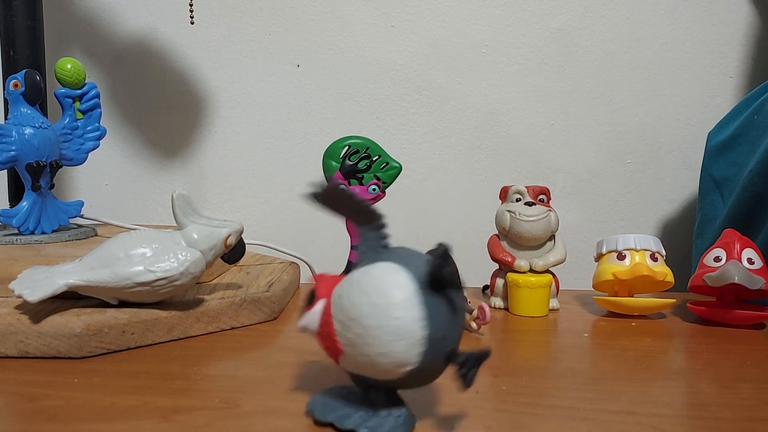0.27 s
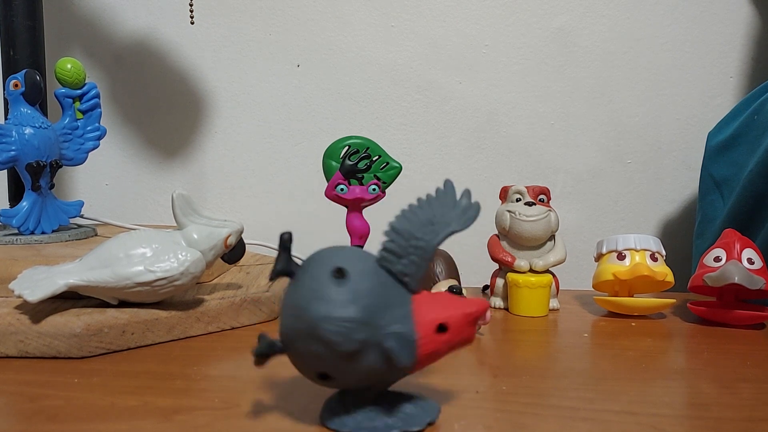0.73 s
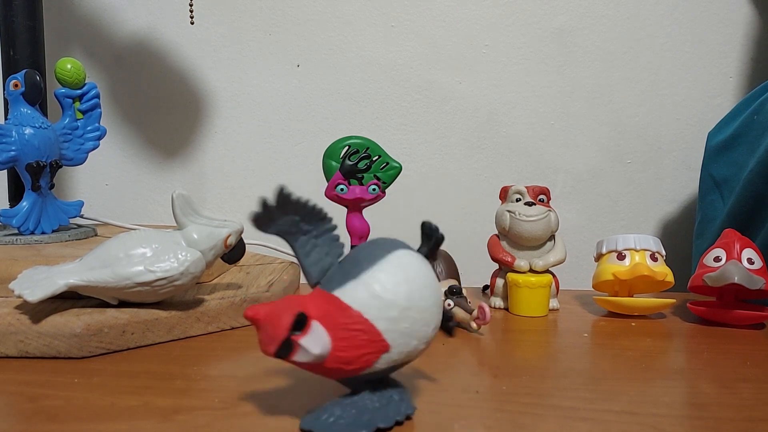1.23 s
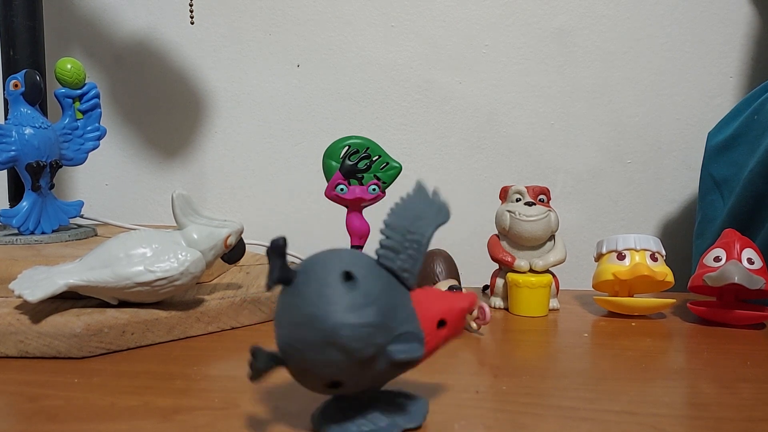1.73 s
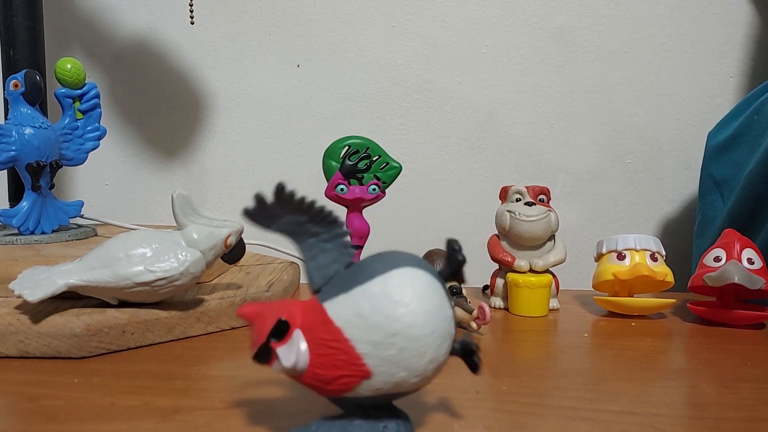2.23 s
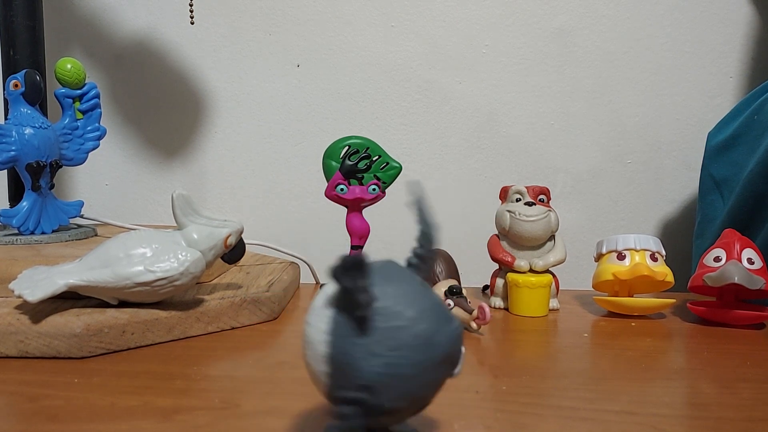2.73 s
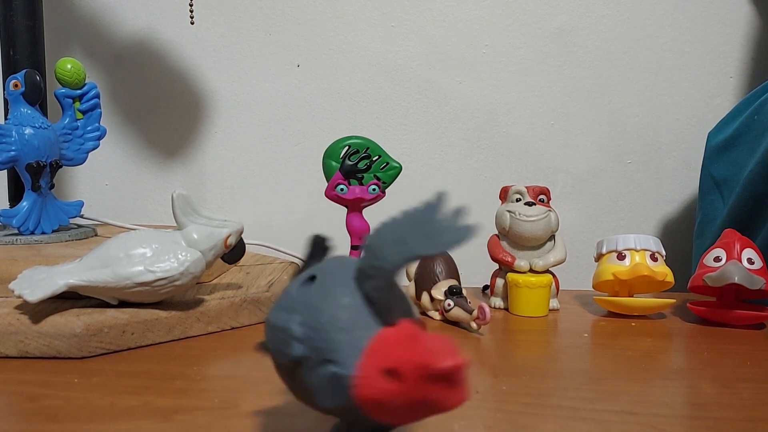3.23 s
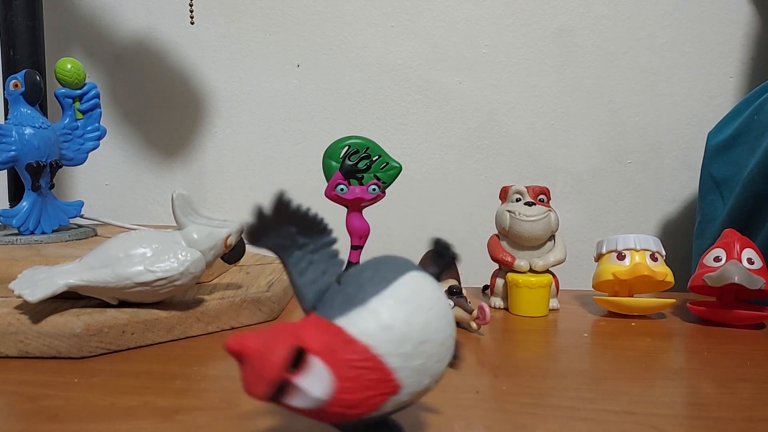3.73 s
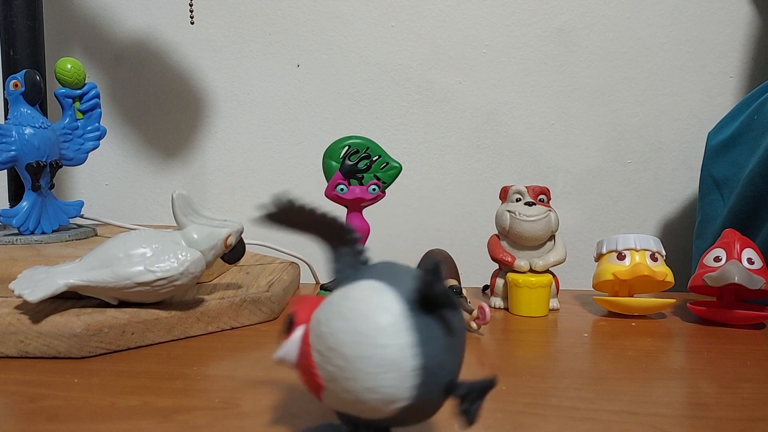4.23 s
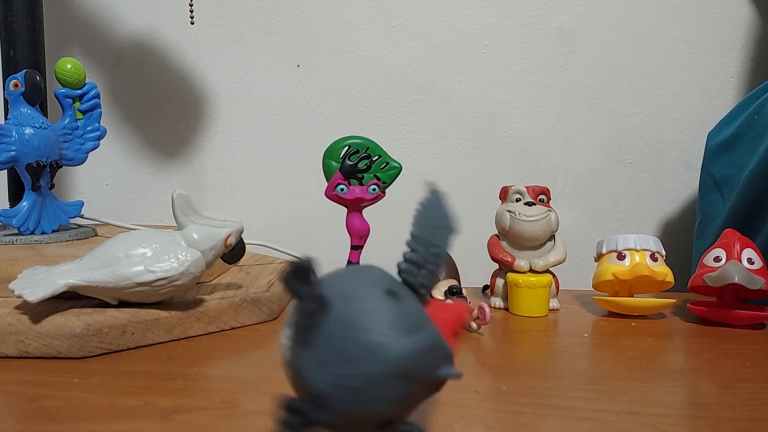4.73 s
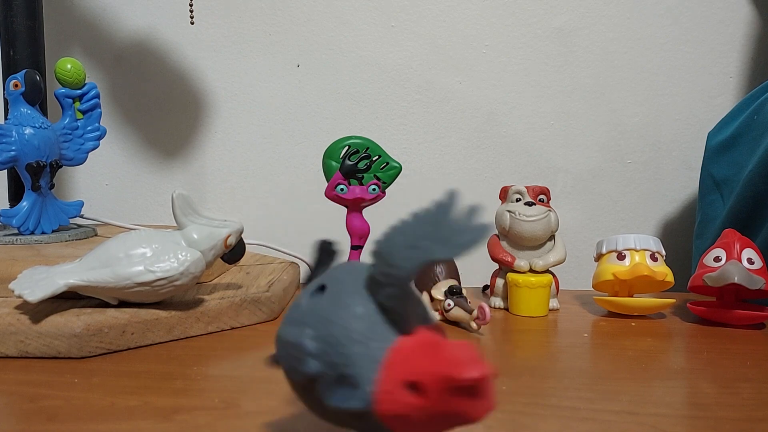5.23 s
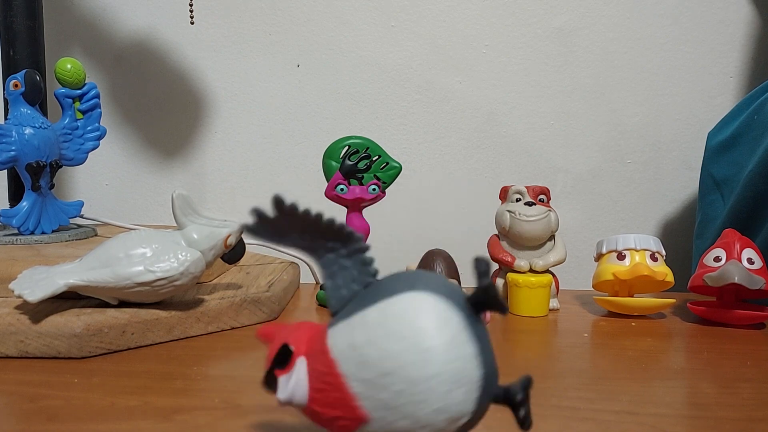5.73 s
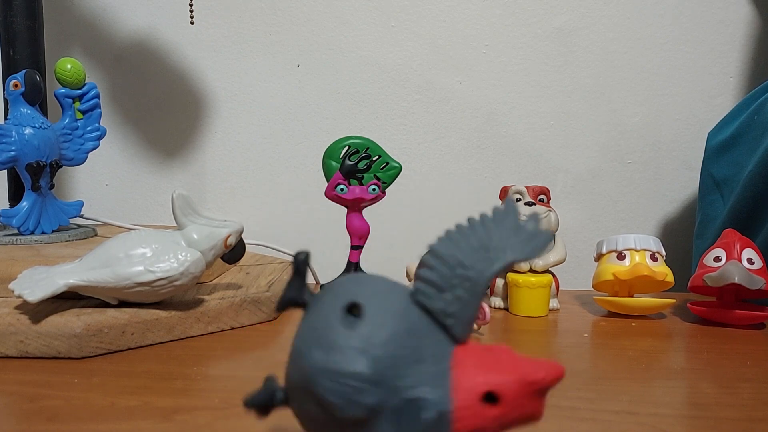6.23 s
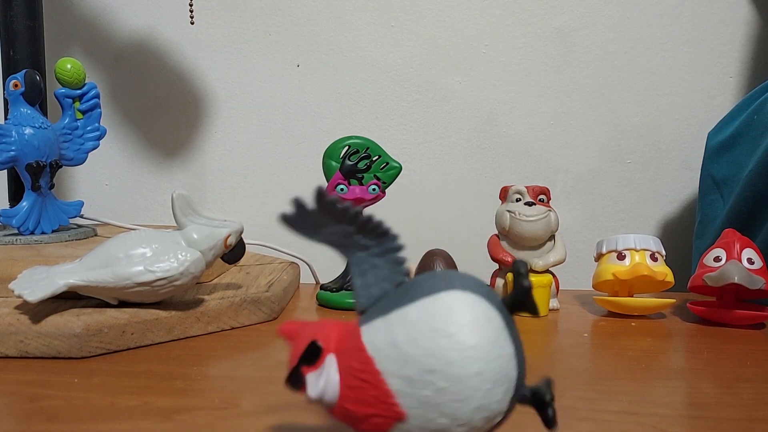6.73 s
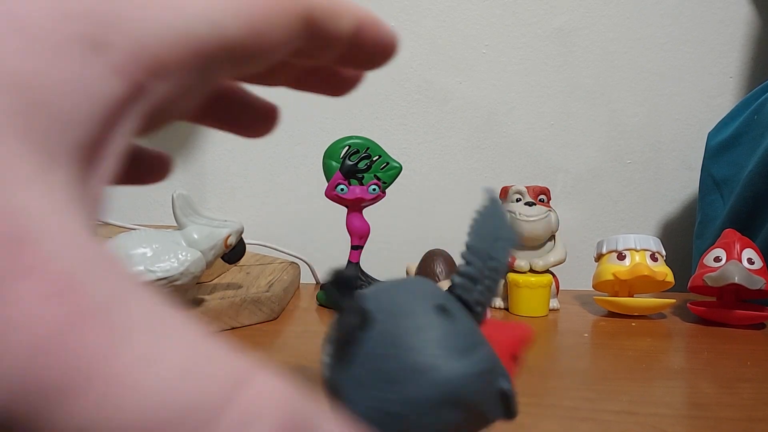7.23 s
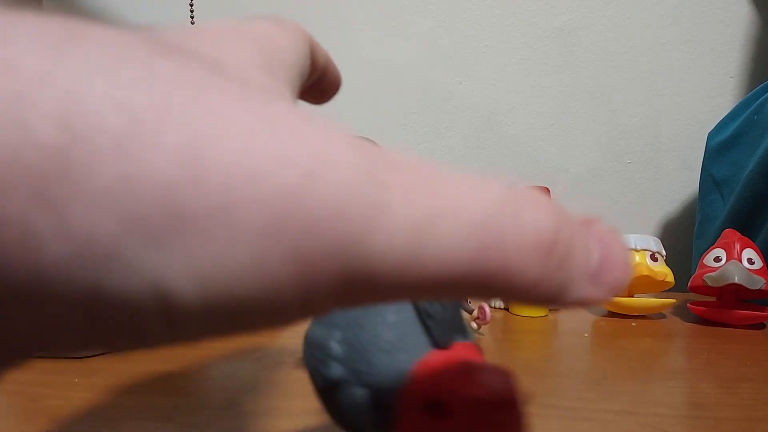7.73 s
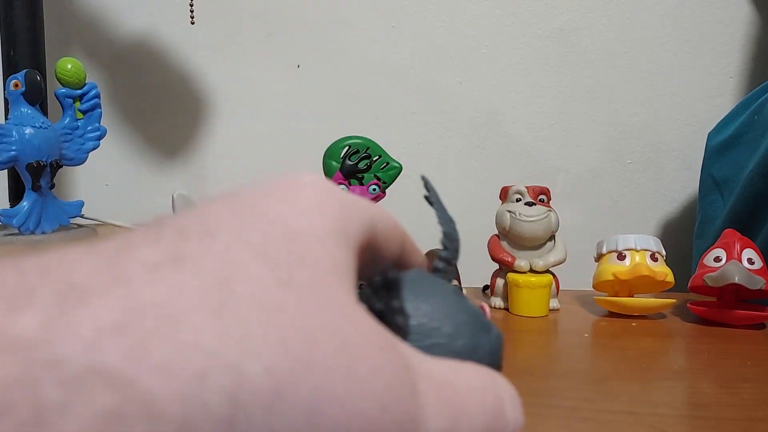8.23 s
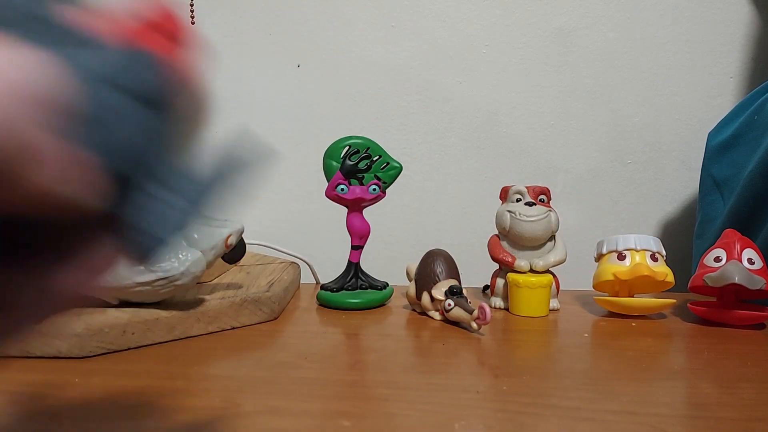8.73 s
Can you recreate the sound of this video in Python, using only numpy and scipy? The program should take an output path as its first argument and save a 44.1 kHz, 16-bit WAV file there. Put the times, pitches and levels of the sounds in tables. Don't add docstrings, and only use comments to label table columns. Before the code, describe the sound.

From the very start a clockwork plastic toy bird whirrs loudly and steadily, close to a stereo pair of microphones on a wooden table. The sound is a dry, bright, grainy rattle of fast gear teeth, swelling slightly about one and a half times a second, its colour changing as the body turns round every 0.7 to 0.9 seconds. Tiny hitches and surges interrupt it. Beneath, the foot rubs and scuffs irregularly, with soft low thuds, notably around 1.3, 2.2, 3.0 and 6.0 seconds, and light shell ticks. At about 8.1 to 8.3 a hand grabs it with knocks and a low bump; the whirr chokes and stops almost completely. At 8.36 it jumps off again, is lifted around 8.6, with a tick near 8.7, and passes close on the left, still whirring at the end, about 9 seconds. A faint fridge hum stays underneath in the small, dry room.

```python
import sys
import numpy as np
from scipy import signal
from scipy.fft import rfft, irfft, next_fast_len
from scipy.io import wavfile
from scipy.ndimage import uniform_filter1d

SR = 44100
rng = np.random.default_rng(int(sys.argv[2]) if len(sys.argv) > 2 else 0)


def to_wav(sig):
    pcm = np.clip(np.atleast_2d(sig), -1, 1) * 32767
    pcm = np.round(pcm).astype(np.int16)
    wavfile.write(sys.argv[1], SR, pcm.T)


def decibels_to_gain(level_db):
    exponent = np.asarray(level_db, float) / 20
    return 10 ** exponent


N = 395577
TIME = np.arange(N) / SR

# [f/Hz, level/dB]
HUM = [(52.58, -72), (67.38, -56.5), (105.27, -63), (120.0, -55), (132.7, -70), (372.8, -84)]
# [f/Hz, density/dB]
AIR = [(25, -24), (45, 9), (60, 14), (90, 4.5), (125, 1), (250, 5), (400, -18.5), (700, -59), (2000, -15.5),
       (16000, -67)]
AIR_DB, ROOM_DB, ROOM_T60_S = -53.5, -4, 0.04

# [f/Hz, width/Hz, rise/dB]
WOOD_MODES = [(130, 47, 2.5), (171, 20.4, -5), (205.8, 21.5, -1), (246.5, 60, -4)]
# [t/s, rise/dB, length/s]
DRAGS = [(0.125, -2, 0.018), (0.215, 11, 0.12), (0.663, 12.5, 0.14), (1.377, 15, 0.13), (1.566, 10, 0.056),
         (1.951, 10.9, 0.092), (2.22, 15.5, 0.12), (2.494, 14.5, 0.12), (2.799, 14, 0.062),
         (2.988, 12, 0.093), (3.198, 15.5, 0.073), (3.846, 9, 0.09), (4.49, 8, 0.13), (5.014, 9, 0.012),
         (5.078, 7, 0.094), (5.193, 13, 0.047), (5.423, 10, 0.098), (5.627, 15, 0.057), (5.807, 19, 0.09),
         (6.081, 8.5, 0.18), (6.525, 10, 0.14), (6.715, 8.5, 0.11), (6.944, 8, 0.18), (7.204, 12, 0.02),
         (7.573, 16, 0.13), (5.3, 5, .03), (8.03, 4, .03), (2.1, -9, .03), (8.34, -8, 0.032),
         (7.942, 8, 0.074), (8.176, 24.5, 0.11), (8.595, 16.5, 0.052)]
# [t/s, level/dB, length/s]
SCUFFS = [(.414, 6, 0.027), (.66, -2, 0.03), (1.1, 3, 0.05), (1.257, -5, .02), (1.352, 7, 0.042),
          (1.54, 6, .04), (3.06, 6, .04), (3.76, -3, .04), (1.04, 6, .03), (5.54, 0, 0.036),
          (7.52, 3, 0.035), (1.94, -4, 0.037), (.91, -1, .03), (2.44, -3, .04), (6.46, 6, .04),
          (1.73, 7.5, .035), (1.87, 7, 0.029), (2.93, 1, .06), (3.34, 1, .035), (3.51, -5, 0.055),
          (3.67, 5.5, 0.06), (3.97, -4, .08), (4.22, 3, .04), (4.35, 5.5, 0.056), (4.58, -10, 0.06),
          (4.7, 7, 0.029), (4.96, 4, 0.045), (5.35, 3.5, .06), (5.45, -10, 0.033), (6.08, -4, .06),
          (6.72, 8, 0.029), (6.98, -5, 0.074), (7.12, -1, 0.04), (7.26, -3, 0.028), (6.63, -1, 0.044),
          (.78, 0, .04), (.97, 5, .04), (1.44, 6, .04), (2.25, 6, 0.074), (3.43, -1, .07), (7.39, 5, 0.087),
          (7.58, -2.5, 0.13), (7.86, 6, 0.026), (8.03, -2, 0.12), (8.2, 8, 0.068), (8.32, -19, 0.036),
          (8.48, 8, 0.056), (1.68, 5, .04), (2.66, -3, .04), (5.65, -2, 0.051), (5.77, 1.5, 0.034),
          (6.8, 3, 0.045), (4.1, -2, .07), (7.03, 1, .05), (7.7, 0, .06), (4.82, 1, .05), (.27, 3.5, .05),
          (.55, 2, .05), (8.85, 3, 0.33)]
# [f/Hz, density/dB]
SCRAPE = [(250, -16.5), (330, -0.5), (450, -1), (620, -9.5), (900, -7.5), (1200, -9.5), (1600, -18)]
# [f/Hz, width/Hz, rise/dB]
SCRAPE_MODES = [(880, 74, 3.5), (1264, 126, 11.5)]
# [t/s, peak/dB, f/Hz]
THUDS = [(0.116, -39, 187), (0.432, -34, 125), (0.554, -36, 126), (0.614, -38, 140), (1.184, -41, 125),
         (1.331, -27.5, 124), (1.968, -37.5, 160), (2.129, -31.5, 142), (2.168, -28, 138),
         (2.255, -26, 130), (2.76, -39, 199), (2.972, -33, 144), (3.134, -39, 122), (3.179, -42, 147),
         (3.822, -38, 126), (3.884, -41, 123), (5.004, -32, 171.5), (5.118, -35, 130), (5.252, -41, 115),
         (5.367, -39.5, 158), (5.435, -37, 194), (5.731, -38, 130), (5.994, -31, 142), (6.068, -31.5, 171),
         (6.676, -38, 136), (6.763, -34, 176.5), (7.196, -43, 135), (8.122, -30, 130), (8.133, -27, 153),
         (8.162, -33, 190), (8.198, -40, 168), (8.214, -29.5, 198), (8.569, -38, 191), (8.611, -41.5, 169),
         (1.398, -42, 195), (1.43, -46, 235), (5.798, -38, 153), (6.801, -46, 201)]
# [t/s, peak/dB, crack over knock/dB]
TAPS = [(0.151, -49, 16), (0.549, -49, 8), (0.614, -43, 3), (0.976, -43.5, 13), (1.854, -51, 23),
        (1.982, -46, 10), (2.14, -41.5, 8), (2.519, -49, 22), (2.762, -48, 18), (3.816, -50, 14),
        (5.063, -43, 3), (5.847, -52, 8), (6.452, -44, 15), (6.591, -51, 22), (6.761, -47, 1),
        (7.189, -48, 21), (0.691, -56, 23), (1.332, -52, 8), (1.431, -57, 14), (2.207, -60, 13),
        (2.24, -48, 6), (2.988, -63, 17), (3.236, -62, 21), (4.385, -60.5, 17), (4.45, -46, 8),
        (5.001, -59.5, 25), (5.8, -50, 8), (7.809, -59, 23), (7.865, -58, 25), (8.459, -39, 2),
        (8.569, -52, 19), (7.458, -48, 11), (8.003, -57, 12), (8.124, -43, 13), (8.173, -34, 9),
        (8.19, -41, 6), (8.247, -37, 8), (8.299, -49, 1), (8.43, -40, 2), (8.5, -43, 4), (8.687, -49, 19)]
BOOM_DB, BOOM_PER_DRAG, SCRAPE_DB, SCRAPE_PER_DRAG = -60.5, 1.04, -65.5, 0.32
OVERTONE, OVERTONE_DB = 2.3, -20.5
TICK_DB = 2

TURNS = [-.5, .2, .93, 1.85, 2.65, 3.48, 4.15, 4.83, 5.5, 6.45, 7.2, 7.95, 8.7, 9.4]
# [t/s, right microphone later by/ms, left minus right/dB]
PLACE = [(0, .105, .3), (2.5, .115, .6), (4.5, .122, .6), (6.2, .11, .7), (7.5, .097, .2), (8.45, .07, -.8),
         (8.6, .15, -.8), (8.7, .24, -.6), (8.76, .31, .8), (8.82, .37, 3.2), (8.9, .41, 5.3),
         (8.97, .45, 8)]
# [f/Hz, density/dB]
SHELL = [(500, -29), (900, -27), (1400, -8), (1600, -3), (2400, 1.5), (2560, 1), (3600, 4), (4600, 2),
         (5500, 3), (7250, -0.5), (7600, -3.5), (9000, -3.5), (10800, -3.5), (14200, -7), (15600, -4)]
# [f/Hz, width/Hz, rise/dB]
SHELL_MODES = [(1720, 300, 4), (2635, 220, 7.5), (4260, 510, 0.5), (7130, 2300, 2)]
# [t/s, swell/dB]
WHEEL_SWING = [(0, 1.2), (2, 1.5), (3.5, 1.4), (4.5, 1.5), (5.5, 0.4), (6.5, 0.1), (8.2, 0.7)]
# [t/s, depth/dB, length/s]
CATCHES = [(0.175, -4, 0.036), (0.289, -8, 0.011), (0.743, -1.5, 0.038), (1.033, -6, 0.014),
           (1.112, -4.5, 0.049), (1.237, -3.5, 0.026), (1.402, -3, 0.048), (1.791, -14, 0.0091),
           (1.921, -7, 0.033), (2.145, -5.5, 0.016), (2.42, -2, 0.026), (2.913, -7, 0.029),
           (3.587, -1.5, 0.063), (4.22, 0, 0.043), (4.909, -2.5, 0.053), (5.418, -3, 0.03),
           (5.582, -4, 0.043), (5.732, -5.5, 0.015), (5.932, -1.5, 0.053), (6.4, -3.5, 0.023),
           (6.515, -3, 0.032), (6.66, -4, 0.038), (7.059, -2.5, 0.09), (7.224, -2, 0.027),
           (7.403, -1, 0.045), (7.757, -2.5, 0.053), (7.907, -3, 0.018), (8.057, -6, 0.031)]
# [t/s, rise/dB, length/s]
SURGES = [(0.155, 1.5, 0.01), (0.544, 1, 0.014), (1.551, 1.5, 0.013), (2.2, 1, 0.011), (2.913, 3.5, 0.015),
          (.045, 0.8, 0.017), (.13, -1.1, .015), (.975, 1, 0.027), (1.093, -0.5, 0.014),
          (1.457, 0.9, 0.017), (2.095, 1, .025), (2.839, 1.4, .015), (3.717, -1.3, 0.021),
          (3.846, -0.5, 0.013), (4.634, -1.3, .02), (5.817, 0.6, 0.017), (6.051, 1, 0.012),
          (6.46, 1.1, 0.023), (6.79, -0.6, 0.02), (7.124, 1, 0.019), (7.817, 1.2, 0.017),
          (3.158, 1.5, 0.028), (3.233, 0.5, 0.015), (3.587, 1, 0.015), (4.071, 1.5, 0.0094),
          (4.45, 1.1, 0.012), (4.669, 0.83, 0.15), (5.143, 1.2, 0.015), (5.213, 1.5, 0.032),
          (5.373, 1.5, 0.014), (5.872, 1.5, 0.023), (6.036, 1, 0.015), (6.203, 0.9, 0.015),
          (6.341, 1, 0.013), (7.188, 0.5, 0.014), (7.548, 1, 0.012), (7.613, 1, 0.011), (8.004, 2, 0.0065),
          (7.947, -1.5, 0.014), (8.171, 1.5, 0.048)]
# [t/s, depth/dB, length/s]
SNAGS = [(.675, -10, 0.0069), (.86, -2.5, .025), (1.95, 1, .02), (2.883, -6, 0.012), (3.8, 0, 0.13),
         (5.1, -3, 0.04), (5.3, -3.5, 0.023), (5.4, -12, 0.0079), (5.62, -6, 0.012), (5.743, -11.5, .014),
         (6.28, -2, 0.029), (6.73, -1, .06), (7.5, -2.5, 0.036), (7.98, 1, 0.045), (8.125, -10, 0.011)]
# [t/s, whirr level/dB]
STALL = [
    (8.19, -34),
    (8.21, -27.5),
    (8.235, -30),
    (8.255, -33.5),
    (8.268, -48),
    (8.297, -57),
    (8.301, -42),
    (8.305, -58),
    (8.315, -61),
    (8.3535, -77),
]
# [t/s, whirr level/dB]
RESTART = [
    (8.3564, -39),
    (8.39, -35),
    (8.49, -32),
    (8.564, -33.5),
    (8.572, -29.5),
    (8.67, -30.5),
    (8.82, -30),
    (8.84, -27),
    (8.97, -29.5),
]
# [t/s, level/dB]
FOOTING = [(0, 0.2), (.6, -0.5), (.93, 1), (1.08, 1), (1.4, 0), (2.3, 0.5), (2.7, -1), (2.9, 1), (3.3, -1),
           (3.6, 1.5), (4.05, -0.5), (4.5, 0), (4.7, -1.5), (5.3, 0.5), (5.7, -0.5), (6.0, 0), (6.4, -2.5),
           (6.65, 0.5), (6.82, -1), (7.1, -1), (7.7, -1), (8.2, -0.5), (8.4, 1.5), (8.6, 3.5), (8.76, 2),
           (8.97, 4)]
# [t/s, level/dB, length/s]
BUZZES = [(0.814, 5, 0.039), (2.68, -0.5, 0.044), (0.38, -2.5, 0.05), (0.477, 2.5, 0.04), (0.83, -3, 0.044),
          (1.06, -2, 0.06), (3.02, -2, 0.067), (3.9, 0.5, 0.056), (4.94, -3, 0.058), (7.3, 0.5, .05),
          (2.76, -1.5, .04), (1.5, -0.5, 0.1), (4.35, -1.5, 0.11), (3.82, 1, 0.048), (7.42, -1.5, 0.1),
          (8.0, -0.5, .03), (5.7, 4, .05), (2.5, 0.5, 0.071), (7.06, -5, 0.11), (8.05, -1, .06),
          (8.208, 7, 0.0051), (3.7, 0.5, 0.037), (7.192, 8.5, 0.0065), (6.2, 3, 0.14), (6.24, -1, 0.21),
          (7.95, 0, 0.069), (8.76, -7, 0.053), (0.032, 2.5, 0.074), (5.65, -3, 0.2), (1.89, -2, 0.02)]
# [t/s, level/dB, length/s]
GLINTS = [(.3, 9, .06), (.55, 5, 0.14), (1.1, 10, .06), (1.5, 7, 0.13), (1.8, 2, 0.067), (2.2, 4, .05),
          (2.5, 2, .06), (2.9, 7, 0.11), (3.25, 3.5, .08), (3.48, -10, 0.071), (3.7, 9, 0.045),
          (4.3, 4, .08), (4.75, -3, .06), (5.2, 3, 0.058), (5.55, -2, .08), (6.08, 4.5, 0.08),
          (6.6, 0, 0.11), (6.95, 1, 0.072), (7.3, 2, .08), (7.75, 7, 0.098), (8.1, 2, .06), (8.75, 4, 0.15)]
# [t/s, level/dB, length/s]
SWEEPS = [(.15, 1, .15), (.65, 3, 0.069), (1.0, 0, .12), (1.6, 5, .15), (2.15, -9, .15), (2.6, 6, .12),
          (3.0, -1, .1), (3.35, 3, 0.073), (3.8, 0, .1), (4.1, 3, 0.12), (4.4, -2, 0.074), (4.7, 4, 0.11),
          (5.1, 0, .1), (5.35, 7, 0.087), (5.6, -3, .1), (6.25, 6, .1), (6.65, -5, .1), (7.1, 8, .12),
          (7.95, 1.5, .1), (8.5, -2, .1)]
# [t/s, left/dB, right/dB]
UNDERSIDE = [(8.3, -30, -30), (8.5, -20, -15), (8.56, -21, -15), (8.62, -15, -11), (8.7, -19, -10),
             (8.78, -12, -13), (8.84, -24, -15), (8.9, -13, -15), (8.97, -7, -17)]
# [mean/dB, once a turn/dB, phase/rad, twice a turn/dB, phase/rad, once lifted/dB]
RING = (-12, 0.5, 1.3, 0.72, 1.2, -2.5)
WALL = (-7.5, 1.27, 0.5, 0.6, 0.3, -1)
TREBLE = (2.05, -0.27, -0.32, 0.31, 0.072, -0.62)
FACE = (-15.5, 2, -6.5, -1, 2, -8)
WING_LOW = (-23, -0.5, -0.4, -0.5, 1.5, -1)
WING_HIGH = (-20.5, -1.5, -2, -0.5, 3.3, -1)
WING_TIP = (-21, 3, 0, -0.5, 0, -6)
TIP_PER_SWEEP, SNAP_SHARE = -1.1, 0.18
WHIRR_DB, TEETH_HZ, TEETH_WANDER = -32.5, 268.1, 0.07
SPRING_WHEEL_HZ, SPRING_PHASE = 1.537, 0.48
LIFT_S, LIFT_LENGTH_S = 8.4, 0.29

# [f/Hz, level/dB]
CAPSULE = [(750, 0), (1000, -2), (1300, 0), (6900, 1), (7600, -2.5), (9500, -2), (12500, -1), (15600, 0)]
# [f/Hz, left minus right/dB]
PORTS = [(200, -1), (330, -4.5), (700, 2.5), (1000, 4.5), (1350, 0.9), (1700, 0.5), (2300, 1.5), (4400, 0),
         (6700, -3), (7700, 2), (9500, 3), (14500, 0)]
LEFT_VENT_HZ, TOP_HZ = 101, 15690


def level(x, db=0):
    return x * decibels_to_gain(db) / np.sqrt(np.mean(x ** 2))


def curves(rows):
    s, *columns = np.transpose(rows)
    return [np.interp(TIME, s, c) for c in columns]


def colour(x, points, modes=()):
    size = 2 * next_fast_len(N // 2 + 1)
    hz = np.arange(size // 2 + 1) * SR / size + 1e-3
    points_hz, points_db = np.array(points)[:, :2].T
    db = np.interp(np.log(hz), np.log(points_hz), points_db)
    db = db + sum(top_db / (1 + (2 * (hz - f) / w) ** 2) for f, w, top_db in modes)
    fold = np.r_[1, np.full(size // 2 - 1, 2), 1]
    cepstrum = irfft(np.log(decibels_to_gain(db)), size)[:size // 2 + 1] * fold
    return irfft(rfft(x, size) * np.exp(rfft(cepstrum, size)), size)[..., :N]


def band(x, lo_hz, hi_hz):
    return signal.sosfilt(signal.butter(2, [lo_hz, hi_hz], "band", fs=SR, output="sos"), x)


def delay(x, ms):
    fine = signal.resample_poly(x, up=4, down=1)
    return np.interp(4 * (np.arange(N) - ms * SR / 1000), np.arange(4 * N), fine, left=0)


def walk(rate):
    k = int(SR / rate)
    held = np.repeat(rng.standard_normal(N // k + 1), k)
    return 1.1 * uniform_filter1d(uniform_filter1d(held, k), k)[:N]


def add(out, s, sound):
    i = int(s * SR)
    out[i:i + len(sound)] += sound[:max(N - i, 0)]


def bumps(rows, release=1):
    out = np.zeros(N)
    for s, db, length in rows:
        i = max(int((s - 3 * length) * SR), 0)
        t = TIME[i:i + int(6 * length * SR)] - s
        side = np.where(t < 0, length, release * length)
        add(out, i / SR, db * np.exp(-(t / side) ** 2))
    return out


def fridge():
    lines = np.zeros(N)
    for hz, db in HUM:
        lines += decibels_to_gain(db + 6.0 + 0.2 * walk(3.2)) * np.sin(2 * np.pi * (hz * TIME + rng.random()))
    air = colour(rng.standard_normal((3, N)), AIR)
    return lines + level(air[0] + 0.96 * air[1:], AIR_DB)


def room(x):
    t = TIME[:SR // 20]
    decay = np.exp(-np.log(1000) * t / ROOM_T60_S) * (t > 0.001)
    echoes = rng.standard_normal((4, 2, len(t))) * decay
    share = np.array([walk(13) for _ in echoes])
    share = share / np.sqrt(np.sum(share ** 2, axis=0))
    out = np.zeros((2, N))
    for weight, echo in zip(share, echoes):
        out += signal.oaconvolve(weight * x, level(echo) / np.sqrt(len(t)), axes=1)[:, :N]
    return out


def foot_drag():
    lean_db = bumps(DRAGS)
    rub = rng.standard_normal((4, N)) * decibels_to_gain(3.2 * walk(40))
    modes = [(f, w, 16.5 + db) for f, w, db in WOOD_MODES]
    boom = level(colour(rub[0], [(90, -59), (120, -21.0), (280, -20.5), (400, -39.5)], modes))
    boom = boom * decibels_to_gain(BOOM_DB + BOOM_PER_DRAG * lean_db)
    scrape = level(colour(1.23 * rub[1] + 1.27 * rub[2:], SCRAPE, SCRAPE_MODES))
    scrape_db = SCRAPE_DB + SCRAPE_PER_DRAG * lean_db + bumps(SCUFFS)
    return boom, scrape * decibels_to_gain(scrape_db + 3.0)


def thuds():
    out = np.zeros(N)
    t = TIME[:SR // 6]
    swell = (1 - np.exp(-t / 0.0091)) * np.exp(-t / 0.018)
    for s, db, hz in THUDS:
        tone = np.sin(2 * np.pi * hz * t) + decibels_to_gain(OVERTONE_DB) * np.sin(2 * np.pi * OVERTONE * hz * t)
        add(out, s - 0.004, decibels_to_gain(db + 6.0) * swell * tone)
    return out


def taps():
    out = np.zeros(N)
    t = TIME[:SR // 6]
    shape = (len(TAPS), len(t))
    knocks = band(rng.standard_normal(shape) + decibels_to_gain(TICK_DB + 9) * (t == 0), 790, 2100)
    cracks = band(rng.standard_normal(shape) + decibels_to_gain(TICK_DB) * (t == 0), 1600, 5900)
    for (s, db, crack_db), knock, crack in zip(TAPS, knocks, cracks):
        add(out, s, decibels_to_gain(db + 8.0) * np.exp(-t / 0.0091) * knock)
        add(out, s, decibels_to_gain(db + crack_db + 3.5) * np.exp(-t / 0.0067) * crack)
    return out


def table():
    boom, scrape = foot_drag()
    wood = boom + thuds() + taps()
    return np.array([wood, np.roll(wood, shift=int(0.00016 * SR))]) + scrape


def gears(parts):
    hz = TEETH_HZ * (1 + TEETH_WANDER * walk(5))
    teeth = np.cumsum(hz * (1 + 0.059 * walk(40))) / SR
    tooth_db = 2.0 * rng.standard_normal(N // 100)[teeth.astype(int)]
    contact = decibels_to_gain(tooth_db) * np.exp(-(teeth % 1) / 0.21)
    release = 0.36 * np.exp(-((teeth + 0.5) % 1) / 0.068)
    burst = 0.56 + contact + release
    slaps = (rng.random(N) < 25 / SR) * rng.exponential(size=N)
    burst = burst * (1 + 0.064 * signal.lfilter([1], [1, -np.exp(-1 / (0.0036 * SR))], slaps))
    click_db = np.minimum(2.2 * rng.exponential(size=(parts + 1, N)), 11)
    clicks = rng.standard_normal((parts + 1, N)) * decibels_to_gain(click_db)
    shared = 0.73 * clicks[0] + clicks[1:4]
    return burst * decibels_to_gain(1.23 * walk(20) + 1.2 * walk(90)) * np.vstack([shared, clicks[4:]])


def turned(angle, part):
    mean_db, once_db, once, twice_db, twice, lifted_db = part
    lifted = np.clip((TIME - LIFT_S) / LIFT_LENGTH_S, 0, 1)
    turning_db = once_db * np.cos(angle - once) + twice_db * np.cos(2 * angle - twice)
    return mean_db + turning_db + lifted_db * lifted


def drive():
    load_db = curves(WHEEL_SWING)[0] * np.cos(2 * np.pi * SPRING_WHEEL_HZ * TIME - SPRING_PHASE)
    jolts_db = 1.11 * bumps(CATCHES) + 2.54 * bumps(SURGES) + bumps(SNAGS, SNAP_SHARE)
    return np.where(TIME < STALL[0][0], WHIRR_DB + load_db + jolts_db, curves(STALL + RESTART)[0])


def shell_paths(parts, angle, lag_ms):
    ears = np.zeros((2, N))
    for k, part in enumerate(parts):
        away = angle + 2.075 * k
        path_ms = 0.601 + 0.267 * k + 0.085 * np.sin(away) + 0.051 * walk(5)
        across_ms = lag_ms - 0.0065 * np.cos(angle) + 0.027 * np.cos(away) * k + 0.028 * walk(7.2)
        facing = decibels_to_gain(-2.5 * k + 1.3 * np.cos(away + 2.56))
        ears += facing * delay(part, path_ms + np.array([-across_ms, across_ms]) / 2)
    return ears


def short_waves(parts, angle):
    sides = []
    for k, part in enumerate(parts):
        bounce_ms = 0.302 + 0.1 * np.sin(angle + k) + 0.046 * walk(5)
        sides.append(part + 0.2 * delay(part, bounce_ms))
    return np.array(sides)


def whirr():
    lag_ms, pan_db = curves(PLACE)
    angle = 2 * np.pi * np.interp(TIME, TURNS, np.arange(len(TURNS)))
    parts = colour(gears(parts=5), SHELL, SHELL_MODES)
    ears = shell_paths(parts[:3], angle, lag_ms)
    treble = band(0.42 * ears + short_waves(parts[3:], angle), 8420, 21900)
    ears = ears + 0.11 * parts[3:]

    ring_db = turned(angle, RING) + curves(FOOTING)[0]
    wall_db = turned(angle, WALL) + bumps(BUZZES)
    face_db = turned(angle, FACE) + 0.94 * bumps(GLINTS)
    sweep_db = bumps(SWEEPS)
    wing_low_db = turned(angle, WING_LOW) + 1.5 * walk(9.9) + 1.2 * sweep_db
    wing_high_db = turned(angle, WING_HIGH) + 1.5 * walk(10) + 1.5 * sweep_db
    tip_db = turned(angle, WING_TIP) + TIP_PER_SWEEP * sweep_db

    out = level(band(ears, 440, 2730), 0.58) * decibels_to_gain(ring_db)
    out += level(band(ears, 2605, 3655), -1.23) * decibels_to_gain(wall_db)
    out += level(band(ears, 3980, 8210), -4.5)
    out += level(treble, -2.45) * decibels_to_gain(turned(angle, TREBLE))
    out += level(band(ears, 6340, 7610)) * decibels_to_gain(face_db)
    out += level(band(treble, 10100, 12350)) * decibels_to_gain(wing_low_db)
    out += level(band(treble, 11740, 14100)) * decibels_to_gain(wing_high_db)
    out += level(band(treble, 13500, 15900)) * decibels_to_gain(tip_db)
    out += level(band(ears, 5440, 6600)) * decibels_to_gain(curves(UNDERSIDE))
    return out * decibels_to_gain(drive() + 1.5 + np.array([pan_db, -pan_db]) / 2)


def scene():
    toy = whirr()
    return fridge() + decibels_to_gain(ROOM_DB) * room(toy) + table() + toy


def band_limit(x):
    return signal.sosfilt(signal.butter(12, 17100, fs=SR, output="sos"), x)


def record(dry):
    dry = colour(dry, CAPSULE)
    vent = signal.butter(1, LEFT_VENT_HZ, "high", fs=SR, output="sos")
    left = signal.sosfilt(vent, colour(dry[0], PORTS))
    top_cut = signal.ellip(12, 0.2, 80, TOP_HZ, fs=SR, output="sos")
    mix = signal.sosfilt(top_cut, np.array([left, dry[1]]))
    return band_limit(mix)


dry = scene()
out = record(dry)
to_wav(out)
```